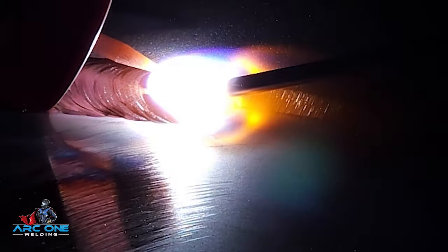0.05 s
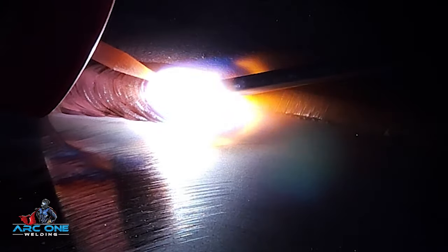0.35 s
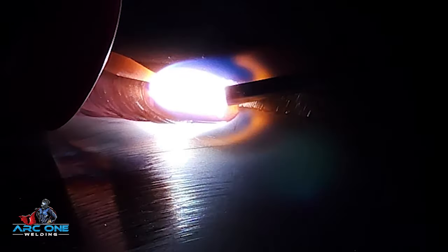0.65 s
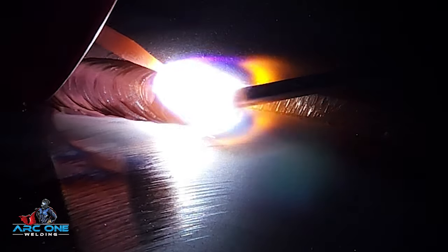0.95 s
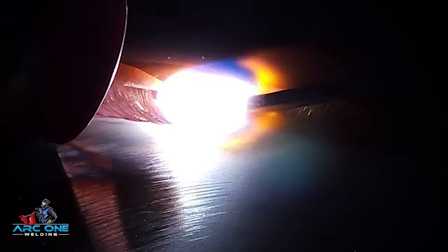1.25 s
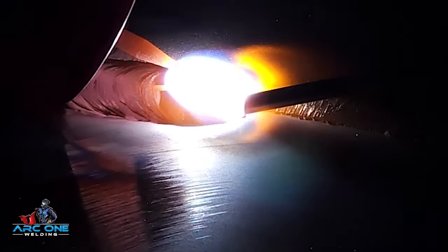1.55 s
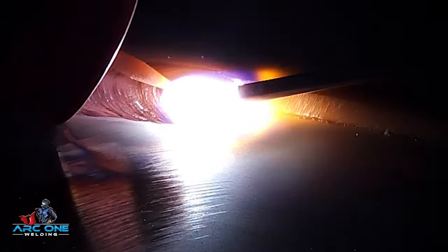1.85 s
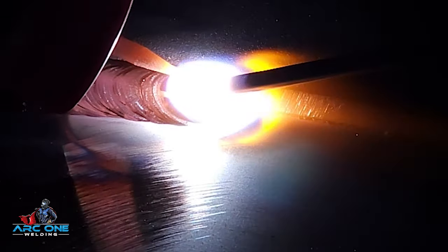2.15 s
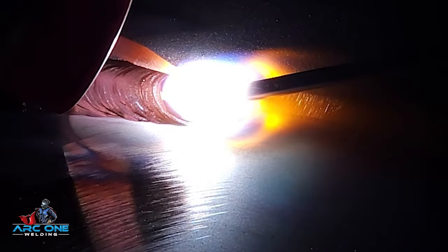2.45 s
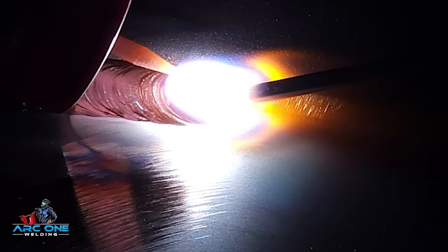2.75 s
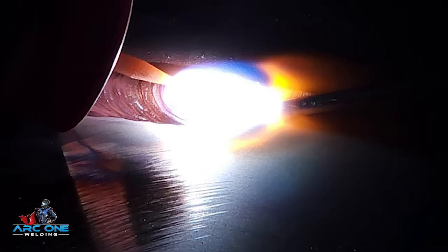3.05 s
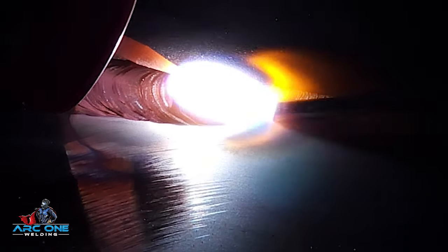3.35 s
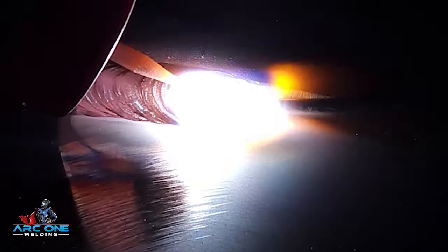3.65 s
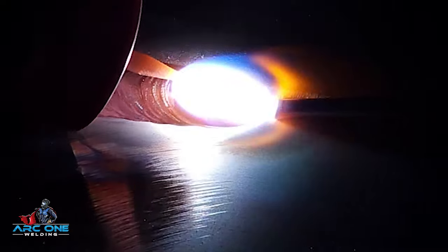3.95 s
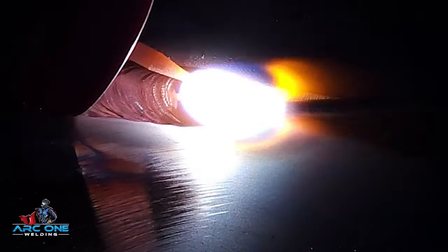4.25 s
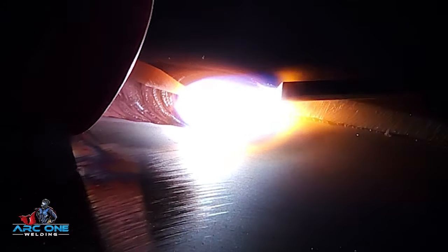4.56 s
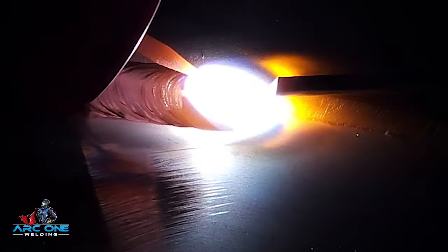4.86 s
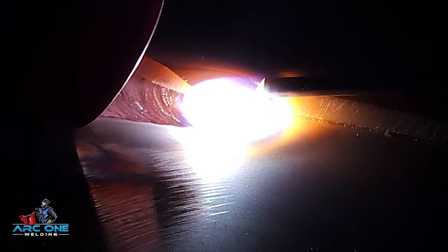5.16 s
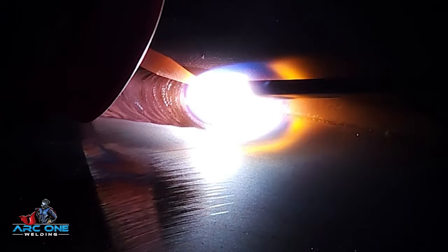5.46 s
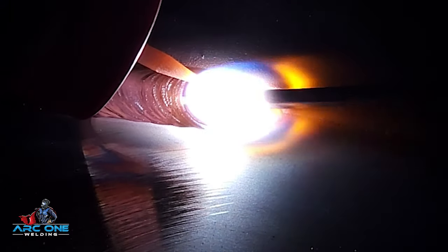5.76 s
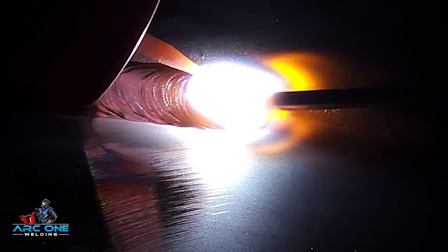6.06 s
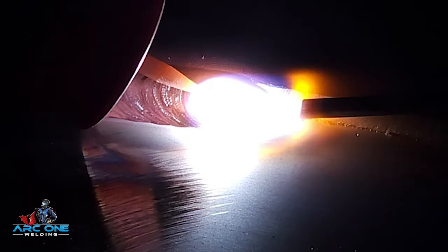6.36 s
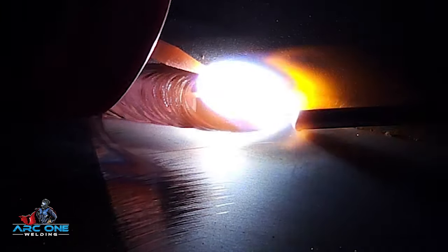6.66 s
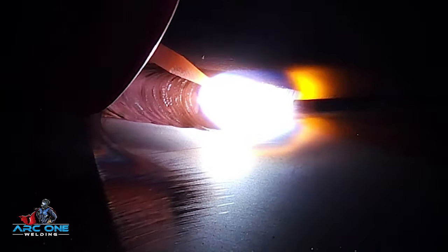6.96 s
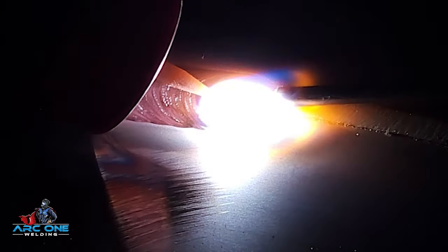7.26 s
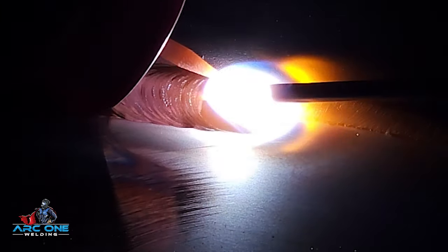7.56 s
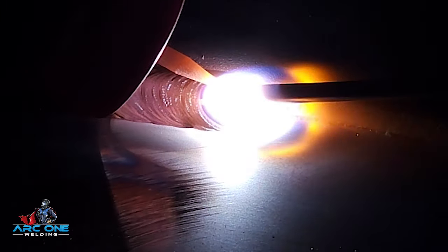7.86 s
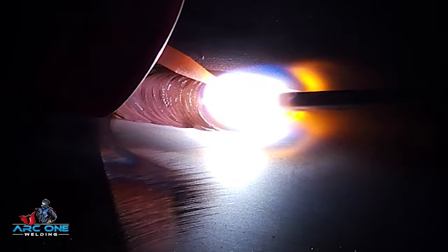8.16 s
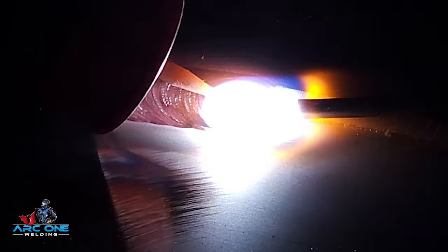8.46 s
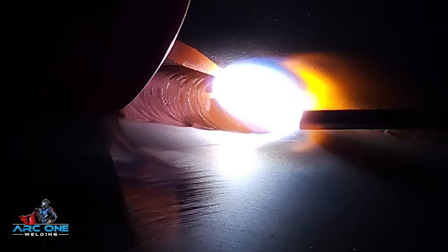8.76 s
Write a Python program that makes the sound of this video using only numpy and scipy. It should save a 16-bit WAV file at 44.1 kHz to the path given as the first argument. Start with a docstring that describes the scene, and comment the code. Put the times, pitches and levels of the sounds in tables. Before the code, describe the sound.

From the start, a welding arc on a steel pipe gives a steady, bright hiss of shielding gas, heard up close and lasting the whole nine seconds or so. Behind it the welding machine holds a wavering mid-pitched whine and a thin, very high whistle, over a faint hum and the gently swelling low rumble of workshop fans. The arc spits with a tiny sharp crack at about 2.4 seconds, more faintly at 2.7, loudest at 5.8 and again at 8. Around 3.3 seconds there is a very soft bump, the hum sinks and the hiss shifts in colour as the hands move. A high ringing edge joins the hiss from roughly 3.8 to 5.3 seconds. At about 8.7 seconds the ceramic torch cup scrapes along the joint with a short gritty rasp, then catches with a quick cluster of dull knocks on the pipe.

```python
"""Steady gas hiss of a TIG arc on a steel pipe, heard up close at two microphone ports.
The shielding gas leaves the cup, combed by reflections that shift as the hands move.
Behind it the welding set whines and whistles over a faint hum and the rumble of shop fans.
The arc spits four times; at the end the ceramic cup scrapes along the joint and knocks on the pipe."""
import sys
import numpy as np
from scipy import signal
from scipy.fft import rfft, irfft
from scipy.io import wavfile
from scipy.ndimage import uniform_filter1d

SR = 44100
rng = np.random.default_rng(int(sys.argv[2]) if len(sys.argv) > 2 else 0)


def unload_audio(sound):
    """Save the sound as a 16-bit wav file, at the path given as the first command line argument."""
    columns = np.transpose(np.atleast_2d(sound))
    # keep every value between -1 and 1, then stretch to whole-number steps
    steps = np.round(np.clip(columns, -1, 1) * 32767)
    wavfile.write(sys.argv[1], SR, steps.astype(np.int16))


N = 392920
TIME = np.arange(N) / SR
BAND_EDGE_HZ = 15880
CATCH_S = 8.836  # the cup catches on the joint

# phase of the left port ahead of the right: freq_hz, lead_rad
PORT_LEAD = [(30, 0), (150, .05), (330, .5), (700, 1.2), (1460, 2.6), (1810, 1.5), (2410, 3.3), (3270, 1.6),
             (3900, 3.1), (4800, 2.6), (7150, 4), (8700, 7), (10800, 7), (11600, 7.6), (12400, 7),
             (14200, 8.4), (15700, 9.5)]


def amp(db):
    """Decibels to gain."""
    return 10 ** (np.asarray(db) / 20)


def unit_rms(x):
    return x / np.sqrt(np.mean(x ** 2) + 1e-20)


def curves(rows, t):
    """Table columns interpolated over time."""
    times_s, *columns = np.transpose(rows)
    return [np.interp(t, times_s, column) for column in columns]


def colour(rows, hz):
    """Table columns interpolated over log frequency."""
    freqs_hz, *columns = np.transpose(rows)
    return np.array([np.interp(np.log(hz + 1), np.log(freqs_hz + 1), column) for column in columns])


def ease(t, at_s, ease_s):
    """Smooth step from 0 to 1."""
    return .5 + .5 * np.tanh((t - at_s) / ease_s)


def bump(t, at_s, half_s):
    """Smooth rise to 1 and back."""
    return np.exp(-((t - at_s) / half_s) ** 2)


def add(mix, start_s, sound):
    """Mix in a two-port sound."""
    part = mix[:, round(start_s * SR):][:, :sound.shape[1]]
    part += sound[:, :part.shape[1]]


def wander(rate_hz):
    """Low-passed random drift, unit rms."""
    lowpass = signal.butter(2, min(rate_hz, SR / 4), fs=SR, output="sos")
    return unit_rms(signal.sosfilt(lowpass, rng.standard_normal(N)))


def patches(shape, bins=7, frames=70):
    """Smooth random field over frequency and time, unit rms."""
    field = rng.standard_normal(shape)
    for _ in range(2):
        field = uniform_filter1d(uniform_filter1d(field, bins, axis=0), frames, axis=1)
    return unit_rms(field)


def port_noise(size):
    """Short-time spectra of white noise, 0 dB per Hz, partly coherent between the ports."""
    # likeness of the ports: freq_hz, coherence
    port_coherence = [(40, .98), (330, .93), (600, .3), (1200, .25), (1600, .4), (1900, .8), (2400, .88),
                      (2800, .3), (3950, .75), (5800, .35), (7500, .84), (10000, .72), (15500, .6)]
    white = rng.standard_normal((2, N)) * np.sqrt(SR / 2)
    hz, t, (left, independent) = signal.stft(white, SR, nperseg=size, noverlap=size - size // 4)
    coherence = np.clip(colour(port_coherence, hz).T, 0, 1)
    right = coherence * left + np.sqrt(1 - coherence ** 2) * independent
    right = right * np.exp(-1j * colour(PORT_LEAD, hz).T)
    return hz, t, np.array([left, right])


def to_sound(spectra, size):
    """Short-time spectra to waveform."""
    return signal.istft(spectra, nperseg=size, noverlap=size - size // 4)[1][:, :N]


def resonances(rows):
    """Two-port noise in steep-sided bands; rows: centre_hz, width_hz, rms_db."""
    hz, power = np.fft.rfftfreq(N, 1 / SR), 0
    for centre_hz, width_hz, rms_db in rows:
        peak = 1 / (1 + (2 * (hz - centre_hz) / width_hz) ** 2) ** 2
        power = power + amp(rms_db) ** 2 * peak / peak.mean()
    left = rfft(rng.standard_normal(N)) * np.sqrt(power)
    right = left * np.exp(-1j * colour(PORT_LEAD, hz)[0])
    return irfft(np.array([left, right]), N)


def ring(x, hz, width_hz):
    """Resonator applied twice for steep skirts, unit rms."""
    band = signal.iirpeak(hz, hz / width_hz, SR)
    return unit_rms(signal.lfilter(*band, signal.lfilter(*band, x)))


def tone(hz, lead_rad, waver, rate_hz):
    """Two-port sine fluttering in level and phase, unit rms."""
    flutter = 1 + waver * (wander(rate_hz) + 1j * wander(rate_hz))
    left = flutter * np.exp(2j * np.pi * hz * TIME)
    right = left * np.exp(-1j * lead_rad)
    return np.array([unit_rms(left.real), unit_rms(right.real)])


def shop(gain_db=-0.97, drift_db=1.6, drone_right_db=-2):
    """Swelling rumble and drone of fans, with the arc's soft roar above."""
    # fans and arc roar, before gain: freq_hz, left_db, right_db
    wash_spectrum = [(20.0, -85, -87), (43.4, -72.5, -80.5), (102, -72.5, -70), (156, -78.5, -85),
                     (280, -75, -76), (317, -71, -77), (383, -85.5, -82), (787, -78, -79.5),
                     (1075, -83, -84.5), (1600, -82, -86.5), (2080, -76.5, -76.5), (2275, -78, -77),
                     (2830, -95, -104), (3720, -115, -120)]
    # rumble swells: centre_s, half_length_s, rise_db
    swells = [(0.04, .15, 5), (2.05, 0.33, 4), (5.92, .24, 5.5), (7.624, .12, 6)]
    # how far each band follows the swells: freq_hz, share
    swell_share = [(110, 0.97), (220, 0.022)]
    # fan drones: centre_hz, width_hz, level_db
    drones = [(47.6, 7.3, -58), (86.6, 25, -61), (214.2, 11, -66), (250.2, 1.2, -65), (322, 26, -61.5),
              (1910, 60, -55.5)]
    hz, t, noise = port_noise(size=2048)
    rumble_db = sum(rise_db * bump(t, centre_s, half_s) for centre_s, half_s, rise_db in swells)
    rumble_db += drift_db * np.interp(t, TIME, wander(8.7))
    swell_db = colour(swell_share, hz).T * (rumble_db - rumble_db.mean())
    wash = to_sound(noise * amp(colour(wash_spectrum, hz)[:, :, None] + swell_db), size=2048)
    return amp(gain_db) * wash + amp([[0], [drone_right_db]]) * resonances(drones)


def hum(pitch_hz=1486, tone_right_db=-11, body_right_db=-3):
    """A faint tone and rushing resonances that sink together."""
    # hum envelope: time_s, level_db
    envelope = [(0, -55.5), (3.25, -56.5), (3.33, -66), (5.2, -62.5), (8.9, -62.5)]
    # rushing bands: centre_hz, width_hz, relative_db
    bands = [(518, 57, -3.5), (1735, 20, -7), (2085, 174, 9)]
    line = amp([[0], [tone_right_db]]) * tone(pitch_hz, lead_rad=-1.2, waver=0.14, rate_hz=8.6)
    body = amp([[0], [body_right_db]]) * resonances(bands)
    return amp(curves(envelope, TIME)[0]) * (line + body)


def welding_set(whine_hz=867, whistle_hz=14775, whistle_left_db=8.3, whistle_right_db=-4, sway_db=0.8):
    """A wavering whine and the inverter's thin whistle, which the left port faces."""
    # whine: time_s, left_db, right_db, lead_rad
    whine_track = [(0, -47, -50, 2.12), (2.9, -47, -51.5, 2.24), (3.3, -49, -49, 1.4),
                   (3.5, -49.5, -59, 1.1), (4, -47, -57, 0.9), (5, -46.5, -56, 1.5),
                   (6, -48.5, -52.5, 1.74), (8.9, -47, -52, 1.32)]
    # whistle, before port gains: time_s, level_db
    whistle_track = [(0.0, -52), (0.25, -58), (1.96, -63), (2.23, -52), (3.0, -56), (3.31, -48), (3.4, -58),
                     (3.64, -57), (3.74, -47), (3.99, -56), (4.16, -49), (4.68, -60), (5.25, -52.5),
                     (7.09, -52), (7.53, -50), (8.45, -52.5), (8.9, -50)]
    left_db, right_db, lead_rad = curves(whine_track, TIME)
    whine = amp([left_db, right_db]) * tone(whine_hz, lead_rad, waver=0.095, rate_hz=12.0)
    whistle_db = curves(whistle_track, TIME)[0] + sway_db * wander(4)
    whistle = amp(whistle_db) * tone(whistle_hz, lead_rad=1.1, waver=0.32, rate_hz=70)
    return whine + amp([[whistle_left_db], [whistle_right_db]]) * whistle


def stroke(touch_s=8.744, bite_s=8.763, rub_db=-47.5, drag_db=-37.8, press_db_per_s=68,
           attack_s=.005, release_s=.009):
    """Force of the cup on the joint: a light rub, then a drag that grows until it catches."""
    rub = amp(rub_db) * ease(TIME, touch_s, attack_s)
    dragging = ease(TIME, bite_s, attack_s) * (1 - ease(TIME, CATCH_S, release_s))
    pressure_db = drag_db + press_db_per_s * np.minimum(TIME - CATCH_S, 0)
    return rub + amp(pressure_db) * dragging


def pipe_shudder(jolt_db=-44, fall_db_per_s=40, rise_s=0.0061, drag_gain_db=-12):
    """Rough, low ringing of the pipe: faint under the drag, stronger once the cup catches."""
    # dull pipe modes: centre_hz, width_hz, relative_db
    modes = [(196, 89, -3.5), (603, 720, -0.5)]
    decay = amp(jolt_db - fall_db_per_s * np.maximum(TIME - CATCH_S, 0))
    jolt = ease(TIME, CATCH_S, rise_s) * decay
    return (jolt + amp(drag_gain_db) * stroke()) * resonances(modes)


def knocks(rise_s=0.0031):
    """Quickly damped thuds: one soft knock as the hum sinks, three as the cup catches."""
    # thuds: start_s, gain_db, pitch_hz, t60_s
    thuds = [(3.263, -34.5, 202, 0.067), (8.8366, -16.5, 370, 0.012), (8.8505, -24.5, 180, .026),
             (8.887, -36, 200, .05)]
    out, t = np.zeros((2, N)), np.arange(SR // 5) / SR
    for start_s, gain_db, pitch_hz, t60_s in thuds:
        envelope = np.exp(-np.log(1000) * t / t60_s) * (1 - np.exp(-t / rise_s))
        thud = envelope * np.sin(2 * np.pi * pitch_hz * t)
        add(out, start_s, amp(gain_db) * np.array([thud, thud]))
    return out


def cup_scrape(slips_per_s=1100, slip_spread_db=4, tick_right_db=-5):
    """Tiny slips and smooth rubbing ring the cup as one rasp; coarser grit makes it tick."""
    # ceramic cup modes: centre_hz, width_hz, relative_left_db, relative_right_db
    modes = [(2000, 520, 5, 1), (3050, 950, 7, 2), (4150, 1100, 4, -7), (5700, 2400, -5, -11)]
    # jumps over grit: start_s, left_peak_db
    grit = [(8.7655, -30), (8.7825, -29), (8.8, -25), (8.8063, -30), (8.820, -26), (8.834, -28)]
    rasp, tick, ticks = 0, 0, np.zeros((2, N))
    for hz, width_hz, *port_db in modes:
        sizes = rng.choice([-1, 1], N) * amp(slip_spread_db * np.minimum(rng.exponential(1, N), 4))
        slips = sizes * (rng.random(N) < slips_per_s / SR)
        friction = unit_rms(slips) + rng.standard_normal((2, N))
        rasp = rasp + amp(port_db)[:, None] * ring(friction, hz, width_hz)
        tick = tick + amp(port_db[0]) * ring(signal.unit_impulse(SR // 100), hz, width_hz)
    for start_s, peak_db in grit:
        add(ticks, start_s, amp(peak_db) * amp([[0], [tick_right_db]]) * tick / abs(tick).max())
    return stroke() * unit_rms(rasp) + ticks


def arc_spits(treble_lag_s=0.00057, fizz_db=-12, fizz_decay_s=0.00074, right_db=-10):
    """Sharp cracks of the arc, treble just behind bass, each with a short fizz."""
    # spits: start_s, left_crack_db
    spits = [(2.4496, -16), (2.6915, -27), (5.7592, -12.3), (8.003, -18)]
    # spit spectrum: freq_hz, relative_db
    spectrum = [(300, -16), (1500, -9), (6000, -7), (9000, -5), (10500, -10), (12500, 3), (15700, 4),
                (16500, -40)]
    out, t = np.zeros((2, N)), np.arange(512) / SR
    hz = np.fft.rfftfreq(len(t), 1 / SR)
    magnitude = amp(colour(spectrum, hz)[0])
    crack = irfft(magnitude * np.exp(-1j * np.pi * treble_lag_s * hz ** 2 / BAND_EDGE_HZ))
    for start_s, crack_db in spits:
        noise = irfft(magnitude * np.exp(2j * np.pi * rng.random(len(hz))))
        fizz = unit_rms(noise) * np.exp(-t / fizz_decay_s)
        burst = (crack / abs(crack).max() + amp(fizz_db) * fizz)[:len(t) // 2]
        add(out, start_s, amp(crack_db) * amp([[0], [right_db]]) * burst)
    return out


def nozzle_ring(hz=11500, width_hz=600, rest_db=-57, ease_s=0.075, right_db=6.0, waver_db=2.5):
    """Gas rings one nozzle mode unsteadily: faint throughout, stronger at some torch angles."""
    # stronger ringing: start_s, end_s, left_db
    spells = [(3.75, 5.35, -53.5), (6.4, 7.15, -58)]
    boost = sum(amp(left_db) * ease(TIME, start_s, ease_s) * (1 - ease(TIME, end_s, ease_s))
                for start_s, end_s, left_db in spells)
    envelope = (amp(rest_db) + boost) * amp(waver_db * wander(7.3))
    return envelope * amp([[0], [right_db]]) * resonances([(hz, width_hz, 0)])


def hand_combs(hz, t, tremor_ms=.004, tremor_hz=2.5, far_phase_rad=.77, near_phase_rad=1.18,
               far_rest_ms=.7, near_rest_ms=.123, near_follow=.715, right_share=0.44, right_lead_ms=0.172):
    """The hand reflects the jet: a comb at each port that slides down as the echo path grows."""
    # the hand swings out once, then creeps back: time_s, far_delay_ms, far_share, near_share
    hand_echoes = [(0, .587, .49, 0), (1.9, .59, .47, 0), (2.2, .578, .49, 0), (2.9, .579, .44, 0),
                   (3.02, .617, .52, 0), (3.12, .675, .58, 0), (3.24, .745, .58, .05), (3.4, .788, .5, .22),
                   (3.53, .8, .42, .24), (3.68, .772, .46, .36), (3.87, .715, .22, .27),
                   (4.3, .713, .1, .3), (4.75, .719, .18, .33), (5.2, .702, .16, .29),
                   (5.4, .674, .13, .12), (6.2, .665, .24, .18), (7.2, .643, .21, .15),
                   (8.9, .631, .12, .12)]
    far_ms, far_share, near_share = curves(hand_echoes, t)
    far_ms = far_ms + tremor_ms * np.interp(t, TIME, wander(tremor_hz))
    near_ms = near_rest_ms + near_follow * (far_ms - far_rest_ms)
    reflectance = (hz[:, None] / 9000) ** .41  # small surfaces reflect short waves best
    phase_per_ms = -2j * np.pi * hz[:, None] / 1000
    far_echo = reflectance * far_share * np.exp(phase_per_ms * far_ms + 1j * far_phase_rad)
    near_echo = near_share * np.exp(phase_per_ms * near_ms + 1j * near_phase_rad)
    # the right port faces away: weaker echo, shorter detour
    right_echo = right_share * far_echo * np.exp(-phase_per_ms * right_lead_ms)
    return 1 + far_echo + near_echo, 1 + right_echo


def gas_jet(gain_db=-66, drift_db=0.44, flutter_db=0.48, sizzle_db=-0.3, patchy_db=1.0,
            swing_s=3.44, swing_half_s=.3, travel_start_s=2.4, fade_db_per_s=0.2):
    """Turbulent hiss of shielding gas; it fades on the left as the torch travels along the joint."""
    # jet spectrum at each port: freq_hz, relative_db
    left_spectrum = [(2000, -27.5), (2750, -16), (3300, -16.5), (3800, -18.5), (4500, -11.5), (5300, -13),
                     (5900, -16.5), (6650, -11.5), (7350, -1.15), (8100, -5.5), (8900, -0.44), (9400, -4),
                     (9900, -9.5), (10400, -15.5), (11100, -13.5), (11600, -5.5), (12300, -5), (13000, -4),
                     (13600, -8.5), (14400, -13), (15100, -13), (15700, -11)]
    right_spectrum = [(2000, -30.5), (2750.0, -32.5), (3400.0, -24), (4000.0, -25.5), (4700.0, -24),
                      (5700.0, -34), (6250.0, -27.5), (6900.0, -19), (7250.0, -16), (8350.0, -14.5),
                      (8900.0, -27), (9300.0, -19), (10300.0, -17.6), (10900.0, -13.5), (11500.0, -6),
                      (12000.0, -23), (12700.0, -12.6), (13250.0, -16), (13800.0, -16), (14450.0, -22),
                      (15100.0, -18.2), (15700.0, -15.8)]
    # left-port tilt during the hand's swing: freq_hz, change_db
    swing_tilt = [(4000, 0), (5000, -1.2), (6400, 0), (7200, -2.5), (8100, 2), (8900, -3.2), (10300, 0),
                  (11600, 2.8), (12500, -.3), (15500, .5)]
    hz, t, spectra = port_noise(size=512)
    left_comb, right_comb = hand_combs(hz, t)
    tilt_db = bump(t, swing_s, swing_half_s) * colour(swing_tilt, hz).T
    fade_db = fade_db_per_s * np.maximum(t - travel_start_s, 0)
    spectra[0] *= amp(colour(left_spectrum, hz).T + tilt_db - fade_db) * left_comb
    spectra[1] *= amp(colour(right_spectrum, hz).T) * right_comb
    level_db = gain_db + drift_db * wander(6.8) + flutter_db * wander(32) + sizzle_db * wander(370)
    spectra *= amp(patchy_db * patches(spectra[0].shape))
    return amp(level_db) * to_sound(spectra, size=512)


def scene():
    steady = gas_jet() + nozzle_ring() + shop() + welding_set() + hum()
    return steady + arc_spits() + cup_scrape() + knocks() + pipe_shudder()


def record(dry):
    """Steep low-pass at the band edge."""
    lowpass = signal.firwin(1023, BAND_EDGE_HZ, window=("kaiser", 9), fs=SR)
    return signal.oaconvolve(dry, lowpass[None], "same")


dry = scene()
out = record(dry)
unload_audio(out)
```